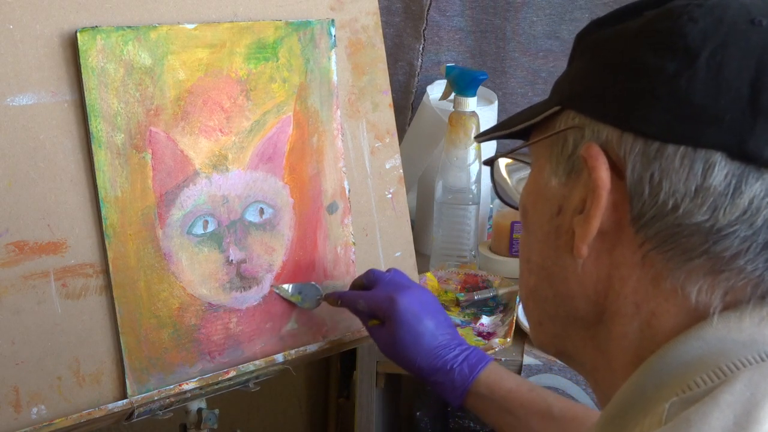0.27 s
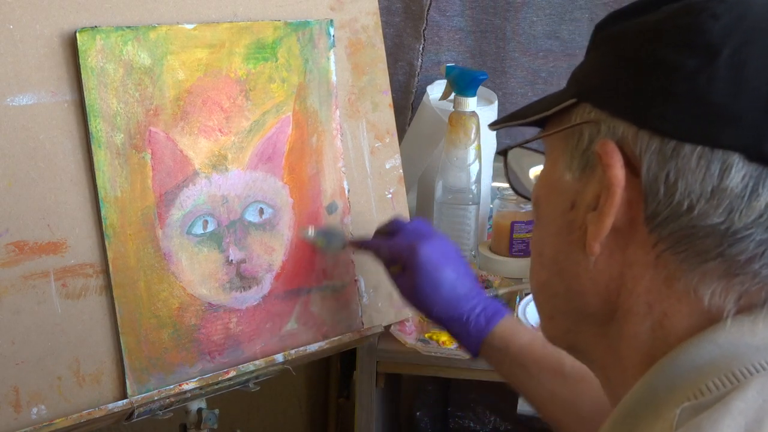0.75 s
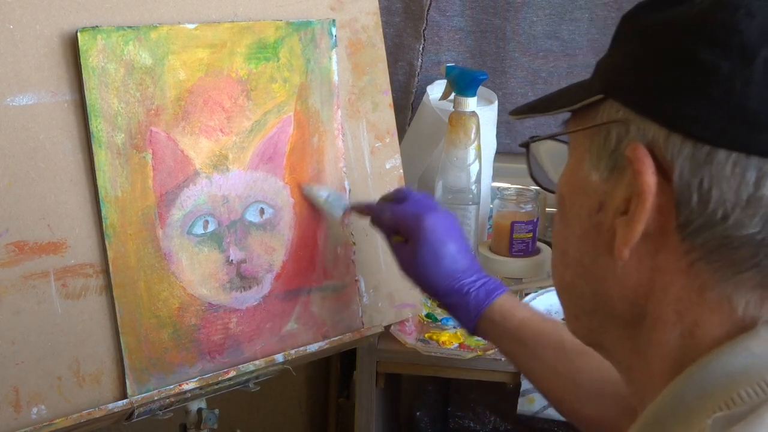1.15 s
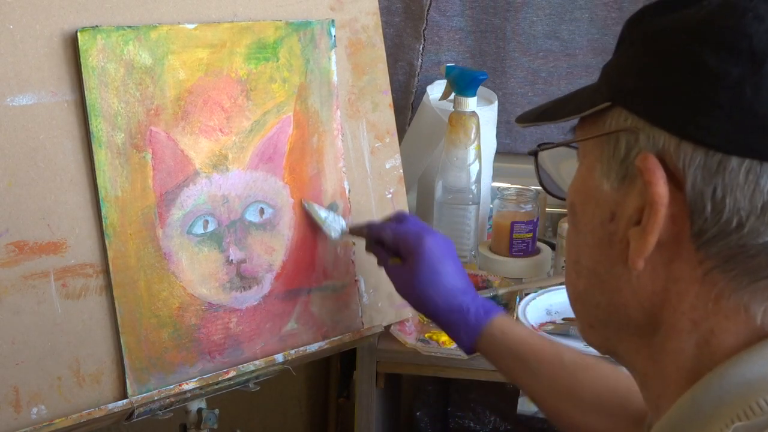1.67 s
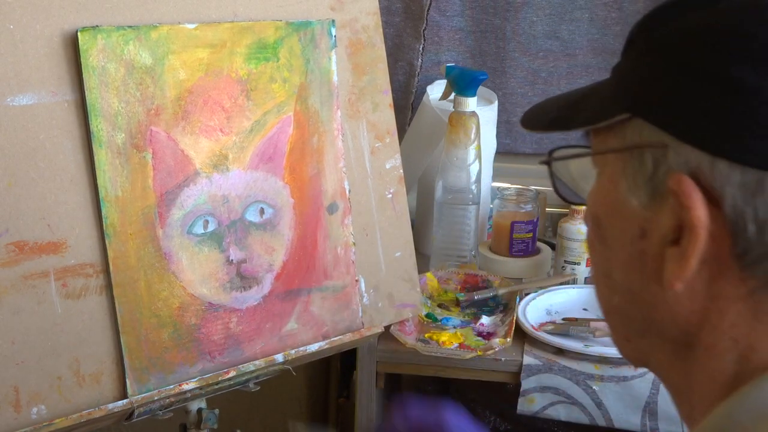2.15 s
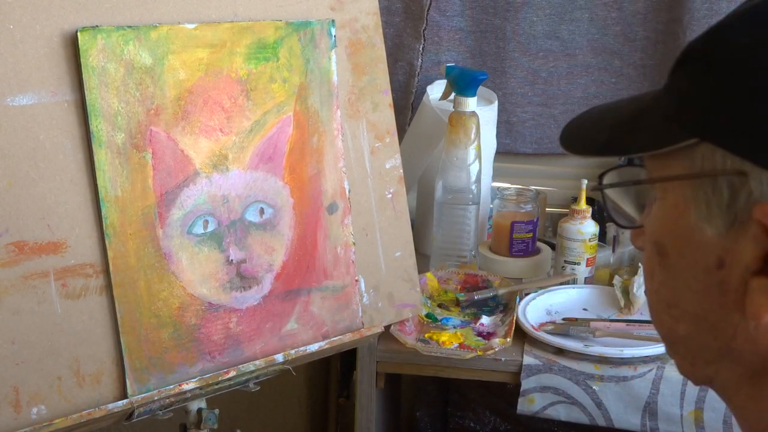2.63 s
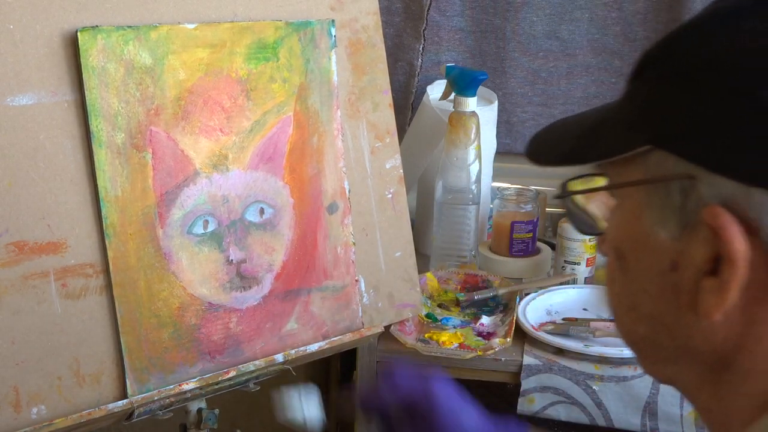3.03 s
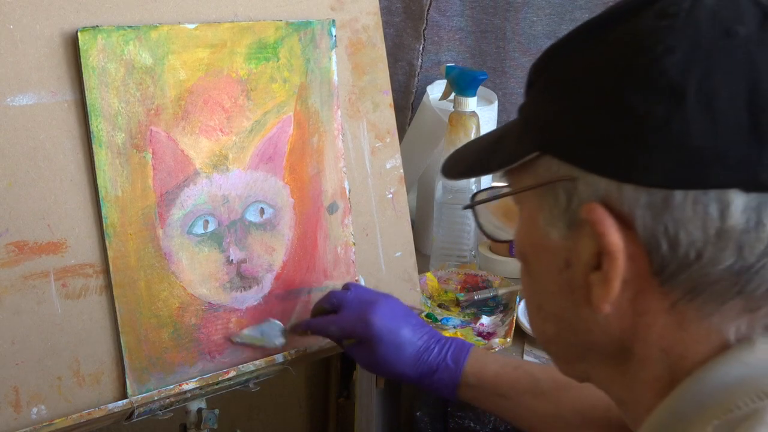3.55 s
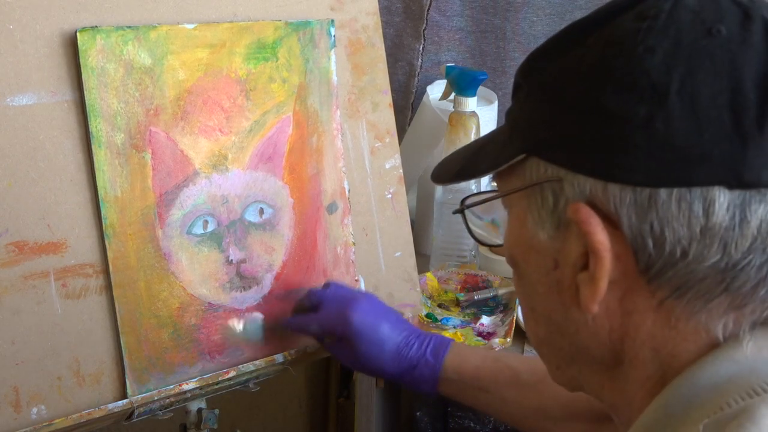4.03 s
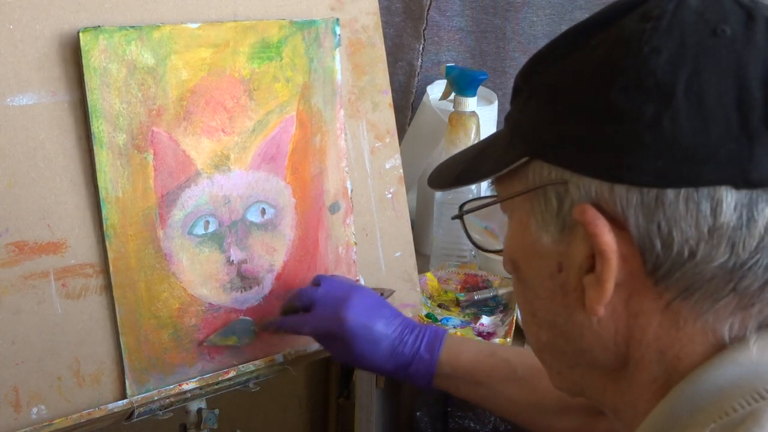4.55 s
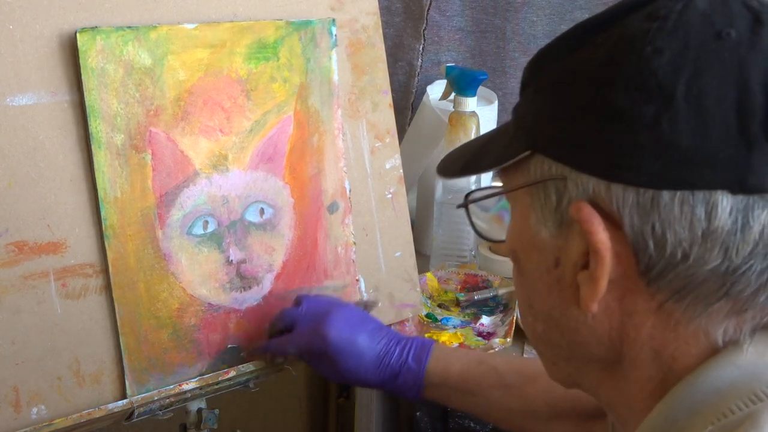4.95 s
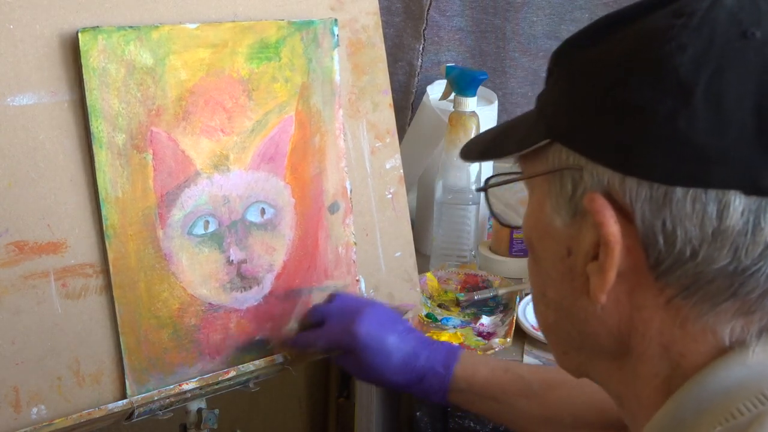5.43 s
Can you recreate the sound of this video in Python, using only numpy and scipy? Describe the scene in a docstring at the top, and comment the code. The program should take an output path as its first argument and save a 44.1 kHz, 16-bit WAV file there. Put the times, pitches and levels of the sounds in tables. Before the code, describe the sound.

A steel palette knife works wet paint on a board in a small, quiet studio. At about 0.4 seconds the blade brushes the surface faintly, and at 0.7 it makes a light scrape with thin squeaks. Two harder, short scrapes follow at 1.3 and 1.8 seconds, each led by a small metallic tap, gritty and ringing, the second ending in a sharp squeak. In the pause, a rubber glove rustles faintly around 2.4 seconds. From 3.4 seconds come light ticks of the tip and soft smears. The flat of the blade then slaps the board six times, unevenly, at about 3.9, 4.4, 4.7, 5.0, 5.2 and 5.4 seconds, with ticks and small snaps of tacky paint between. The stereo microphone stands back, hearing more of the room's short reflections than direct sound, over soft, steady room tone.

```python
"""A steel palette knife works paint on a board, on an easel in a small quiet studio.
One light and two hard scrapes make the blade sing and squeak; after a pause it dabs the board several
times, unevenly spaced, with light tip ticks between. Tacky paint snaps as the blade lifts, and a rubber
glove rustles in the pause. The stereo microphone stands far enough back to hear more room than direct
sound, over a soft bed of air."""
import sys
import numpy as np
from scipy import signal
from scipy.fft import rfft, irfft, next_fast_len
from scipy.io import wavfile
from scipy.ndimage import uniform_filter1d

SR = 44100
rng = np.random.default_rng(int(sys.argv[2]) if len(sys.argv) > 2 else 0)


def pcm_store(signal):
    """Save signal as 16-bit PCM."""
    levels = np.round(np.clip(np.atleast_2d(signal), -1, 1) * 32767)
    wavfile.write(sys.argv[1], SR, levels.astype(np.int16).T)


N = 250929
TIME = np.arange(N) / SR

# Levels in the tables are relative; each source adds its own gain.
# room tone: (frequency [Hz], level [dB])
AIR_SPECTRUM = [(18, -72), (30, -41), (69, -33.5), (123, -17), (196, -12.5), (216, -6.5), (291, -2),
                (338, -6), (567, -1.5), (658, -4), (1080, -0.5), (1520, -11.5), (3440, -18), (4200, -23),
                (11000, -29), (14300, -97), (22000, -120)]
# its stereo width: (frequency [Hz], side minus mid [dB])
AIR_SIDE = [(40, -1.5), (120, -13), (300, -11.5), (500, -6.5), (750, -6), (850, 7.5), (980, 2),
            (1120, -6.5), (1600, 1), (2300, -3), (6000, -4.5), (11000, -8)]
# its lean at the microphone: (frequency [Hz], left minus right [dB])
AIR_LEAN = [(400, 0.5), (700, 1), (900, 1), (1130, -13.5), (1500, -1), (2500, 0.5)]
# the blade barely brushes the board and sings faintly: (middle [s], length [s], level [dB])
FIRST_BRUSH = (0.41, 0.42, -61)
# scrapes: (bite time [s], length [s], skim before it [s], skim [dB], friction [dB], build-up [dB],
# ring [dB], grab [dB], lower blade mode [Hz], upper blade mode [Hz])
SCRAPE_STROKES = [(0.732, 0.19, 0.1897, -50.5, -46.5, -4.5, -48.5, -41.5, 1998, 3175),
                  (1.289, .163, .05, -47, -27.3, 1, -32, -19, 2252, 3144),
                  (1.833, 0.1, .035, -38, -22, -2, -25.5, -25.5, 2131, 3079)]
# friction of the edge on the board: (frequency [Hz], level [dB])
GRIT_SPECTRUM = [(150, -44), (450, -9.5), (900, -18), (1300, -1), (1650, -1), (2200, -1.5), (3500, -1.5),
                 (4050, -14), (4400, -2), (5700, -1.5), (7900, -4.5), (9300, -8), (10700, -11)]
# weaker overtones of the rubbed blade: (frequency [Hz], width [Hz], level [dB])
RUBBED_MODES = [(1230, 87, -13), (1490, 55, -17), (2737, 27, -0.5), (3230, 61, -7), (3845, 97, 0),
                (4270, 53, -1.5), (4550, 110, -1), (5260, 56, -4), (5800, 120, -3.5), (6140, 300, -4),
                (7740, 90, -15)]
# wet paint and rubber: (frequency [Hz], level [dB])
TACK_SPECTRUM = [(300, -9), (1200, 7), (2200, 9.5), (3500, 8.5), (5000, 3.5), (7500, 2), (11000, -5)]
# light smears of wet paint: (middle [s], length [s], level [dB])
PAINT_SMEARS = [(.42, 0.15, -54), (.423, .025, -49.5), (2.08, 0.067, -50), (3.48, .16, -52),
                (3.60, .12, -56.5), (3.83, 0.18, -52), (4.12, 0.3, -55), (4.952, .03, -43)]
# tacky paint lets go of the blade: (time [s], level [dB])
PAINT_SNAPS = [(.416, -33), (1.2447, -30.5), (3.8235, -26.5), (4.1488, -26.5), (4.9405, -25),
               (5.4725, -30.5)]
# the blade sticks and squeaks: (middle [s], length [s], start pitch [Hz], end pitch [Hz], level [dB])
BLADE_SQUEAKS = [(0.417, .03, 4230, 4230, -55), (.426, .033, 5200, 5170, -55),
                 (.615, 0.14, 3140, 3150, -54), (.741, 0.045, 3190, 3200, -42),
                 (0.773, 0.031, 2010, 1990, -39.5), (0.776, 0.053, 1200, 1170, -43),
                 (0.833, 0.023, 4100, 3920, -45.5), (.848, 0.043, 4880, 4730, -53),
                 (0.888, 0.053, 3700, 3460, -48.5), (1.326, 0.094, 1330, 1293, -37),
                 (1.41, 0.046, 4400, 4200, -36.5), (1.919, 0.055, 3140, 3010, -22.5),
                 (2.041, 0.041, 3076, 3020, -50), (2.432, 0.029, 3745, 3680, -49)]
# the blade lands before a stroke: (time [s], ring [dB], edge crack [dB])
BLADE_LANDINGS = [(1.2161, -32, -75), (1.7378, -30, -41), (1.8025, -30.5, -53)]
# ring of the free blade: (frequency [Hz], width [Hz], level [dB])
FREE_MODES = [(1093, 37, -2.5), (1895, 83, -2), (3070, 100, -9.5), (3520, 180, -14.5), (4220, 160, -29),
              (4570, 56, -17), (6170, 165, -37), (7890, 210, -32)]
# the tip touches the board: (time [s], ring [dB], edge crack [dB])
TIP_TICKS = [(3.372, -42, -66), (3.5795, -42, -53), (3.6961, -46, -54.5), (4.0126, -34, -47),
             (4.6402, -35, -44), (4.6773, -39, -39.5), (4.829, -37, -45), (5.0547, -41, -45),
             (5.1668, -30.5, -39.5), (5.4916, -31.5, -35.5)]
# ring of the tip: (frequency [Hz], width [Hz], level [dB])
TIP_MODES = [(1960, 61, -10.5), (2944, 120, -5), (3320, 140, -5.5), (4120, 340, -11)]
# the flat of the blade slaps the board, pinned at a new spot each time: (time [s], knock [dB],
# ring [dB], lower mode [Hz], upper mode [Hz], smear going in [dB], smear coming off [dB])
FLAT_SLAPS = [(3.8801, -27, -30, 3100, 4380, -52, -63), (4.4300, -24.5, -27, 1010, 4100, -47.5, -48.5),
              (4.7190, -20.5, -21, 2100, 3450, -47, -50), (4.9597, -20.5, -25, 3550, 6050, -46, -52.5),
              (5.2125, -25, -25.5, 1670, 3280, -46.5, -53), (5.4198, -21, -21, 1830, 3100, -53, -53)]
# knock of blade on board: (frequency [Hz], width [Hz], level [dB])
BOARD_MODES = [(525, 310, -10.5), (1220, 180, -6.5), (1913, 200, -7.5), (2420, 350, -6), (2960, 100, -5),
               (3160, 170, -9.5), (3375, 180, -3), (5000, 490, -12)]
# the glove rustles: (middle [s], length [s], level [dB])
GLOVE_RUSTLES = [(2.31, 0.067, -60), (2.397, 0.043, -49), (2.433, 0.013, -41), (2.48, 0.13, -58.5),
                 (2.82, 0.02, -53)]
# the studio's decay: (frequency [Hz], time to fall 60 dB [s])
STUDIO_T60 = [(300, .25), (1200, .23), (3000, .24), (6000, .24), (11000, .22)]
# stereo width of its tail: (frequency [Hz], side minus mid [dB])
STUDIO_SIDE = [(200, -12), (600, -9), (900, -8), (1300, -9.5), (2200, -12.5), (5000, -10.5), (11000, -9)]


def from_db(db):
    """Decibels to gain."""
    return 10 ** (np.asarray(db) / 20)


def rms_one(x):
    """Scale to rms 1."""
    return x / np.sqrt(np.mean(x ** 2) + 1e-20)


def at_hz(points, hz):
    """Read a table on a log-frequency axis."""
    points = np.array(points)
    return np.interp(np.log(np.maximum(hz, 1)), np.log(points[:, 0]), points[:, 1])


def coloured(x, spectrum):
    """Shape a sound by a spectrum in dB."""
    size = next_fast_len(len(x))
    hz = np.arange(size // 2 + 1) * SR / size
    return irfft(rfft(x, size) * from_db(at_hz(spectrum, hz)), size)[:len(x)]


def low_cut(x, hz):
    """A gentle first-order bass roll-off."""
    return signal.sosfilt(signal.butter(1, hz, "high", fs=SR, output="sos"), x)


def resonate(x, hz, width_hz):
    """One resonance; a unit click rings with unit energy."""
    radius = np.exp(-np.pi * width_hz / SR)
    feedback = [1, -2 * radius * np.cos(2 * np.pi * hz / SR), radius ** 2]
    return signal.lfilter(np.sqrt((1 - radius ** 2) / 2) * np.array([1, 0, -1]), feedback, x + 1e-18)


def body(x, modes):
    """Resonances in parallel, alternating in sign."""
    return sum((-1) ** k * from_db(db) * resonate(x, hz, width)
               for k, (hz, width, db) in enumerate(modes))


def clicks(rows, column=1):
    """One click per row, as strong as the chosen dB column."""
    rows, out = np.array(rows), np.zeros(N)
    out[np.round(rows[:, 0] * SR).astype(int)] = from_db(rows[:, column])
    return out


def slips(per_s, spread_db):
    """Tiny random slips of uneven size; rms 1."""
    sizes = from_db(spread_db * np.minimum(rng.exponential(1, N), 4)) * rng.choice([-1, 1], N)
    return rms_one(sizes * (rng.random(N) < per_s / SR))


def swells(rows):
    """A smooth rise and fall for each (middle [s], length [s], level [dB])."""
    return sum(from_db(db) * np.cos(np.pi * np.clip((TIME - middle) / length, -.5, .5))
               for middle, length, db in rows)


def stereo(mid, side):
    """Left and right from mid and side."""
    return mid + side * np.array([[1], [-1]])


def air():
    """Steady room tone, wide and leaning right around one kilohertz, near the centre in the bass."""
    mid, side = [rms_one(coloured(white, AIR_SPECTRUM)) for white in rng.standard_normal((2, N))]
    left, right = stereo(mid, coloured(side, AIR_SIDE))
    half_lean = np.array(AIR_LEAN) * [1, .5]
    return from_db(-52.5) * np.array([coloured(left, half_lean), coloured(right, half_lean * [1, -1])])


def singing(hz, width_hz):
    """A friction-driven mode: pitch follows the contact, phase wanders, and friction limits the swing."""
    kicks = rng.standard_normal(len(hz)) + 1j * rng.standard_normal(len(hz))
    swing = signal.sosfilt(signal.butter(2, width_hz / 2, fs=SR, output="sos"), kicks)
    limited = swing / np.sqrt(np.abs(swing) ** 2 + np.var(swing))
    return rms_one(np.real(limited * np.exp(2j * np.pi * np.cumsum(hz) / SR)))


def scrapes():
    """The edge skims, bites on dry ridges of paint and lifts; under pressure two blade modes sing."""
    bite_s, release_s, ring_on_s = .026, .006, .009
    grab_share, grab_s = .785, .027   # late in the stroke the blade grabs and sings out
    free_hz, sag_share = 1910, .75
    catches = rms_one(coloured(slips(per_s=3000, spread_db=3.5), GRIT_SPECTRUM))
    overtones = rms_one(body(slips(per_s=5000, spread_db=4), RUBBED_MODES))
    grit = catches + from_db(-4.5) * overtones
    out, brush = np.zeros(N), swells([FIRST_BRUSH])
    for (start, length, skim_s, skim_db, friction_db, build_db,
         ring_db, grab_db, lower_hz, upper_hz) in SCRAPE_STROKES:
        near = np.abs(TIME - start) < .5
        t = TIME[near] - start
        approach, bite, progress = np.clip([1 + t / skim_s, t / bite_s, t / length], 0, 1)
        since_lift = np.maximum(t - length, 0)
        skim = from_db(skim_db) * approach * (1 - bite)
        pressure = np.sin(np.pi / 2 * bite) ** 2 * from_db(build_db * (progress - 1))
        grab = swells([(start + grab_share * length, grab_s, grab_db)])[near]
        # the bite stiffens the lower mode above its free pitch; it sags as the edge slides on
        rise_hz = (lower_hz - free_hz) * approach * (1 - sag_share * progress)
        lower = singing(free_hz + rise_hz, width_hz=185)
        upper = singing(np.full(len(t), upper_hz), width_hz=185)
        modes = from_db(-3.5) * lower + from_db(-4.5) * upper
        pressed_friction = from_db(friction_db) * pressure * np.exp(-since_lift / release_s)
        pressed_ring = from_db(ring_db) * pressure * np.exp(-since_lift / ring_on_s)
        friction = skim + pressed_friction + from_db(-11) * grab
        ring = brush[near] + from_db(-6) * skim + pressed_ring + grab
        out[near] += from_db(-3) * friction * grit[near] + ring * modes
    return out


def wet_paint():
    """Paint crackles softly as it is spread; when the blade lifts, it lets go with one sharp snap."""
    lead_s, squeeze_s = .011, .11   # each slap squeezes paint as it lands
    lag_s, drag_s = .091, .12   # and drags it coming off
    squeezes = [(time - lead_s, squeeze_s, in_db) for time, *_, in_db, _ in FLAT_SLAPS]
    drags = [(time + lag_s, drag_s, off_db) for time, *_, off_db in FLAT_SLAPS]
    tack = rms_one(coloured(slips(per_s=2000, spread_db=1.5), TACK_SPECTRUM))
    snaps = from_db(16.5) * low_cut(clicks(PAINT_SNAPS), hz=1800)
    return swells(PAINT_SMEARS + squeezes + drags) * tack + snaps


def squeaks():
    """Short stick-slip tones that slide as the contact moves along the blade."""
    out = np.zeros(N)
    for middle, length, start_hz, end_hz, db in BLADE_SQUEAKS:
        near = np.abs(TIME - middle) < .25
        hz = np.interp(TIME[near], [middle - length / 2, middle + length / 2], [start_hz, end_hz])
        out[near] += swells([(middle, length, db)])[near] * singing(hz, width_hz=86)
    return out


def edge_crack(hits, decay_s=.0025):
    """Each contact of the steel edge is a bright, dying burst of tiny slips."""
    decay = np.exp(-1 / (decay_s * SR))
    envelope = signal.lfilter([np.sqrt(1 - decay ** 2)], [1, -decay], hits + 1e-18)
    burst = envelope * rng.choice([-1, 1], N)
    return resonate(resonate(burst, hz=4650, width_hz=3000), hz=6000, width_hz=7100)


def dabs():
    """Landings, tip touches and flat slaps each ring their own modes and crack at the edge."""
    landings = from_db(21) * body(clicks(BLADE_LANDINGS), FREE_MODES)
    ticks = from_db(22) * body(clicks(TIP_TICKS), TIP_MODES)
    # the small board radiates little bass
    knocks = from_db(17.5) * low_cut(body(clicks(FLAT_SLAPS), BOARD_MODES), hz=171)
    pinned_ring = from_db(13.5) * sum(resonate(clicks([slap], column=2), hz, width_hz=220)
                                      for slap in FLAT_SLAPS for hz in slap[3:5])
    edge_hits = (from_db(26) * clicks(BLADE_LANDINGS, column=2)
                 + from_db(22.5) * clicks(TIP_TICKS, column=2)
                 + from_db(11.5) * clicks(FLAT_SLAPS))
    return landings + ticks + knocks + pinned_ring + from_db(-4.5) * edge_crack(edge_hits)


def glove():
    """Thin rubber creases as the hand moves."""
    creases = coloured(slips(per_s=1200, spread_db=5.5), TACK_SPECTRUM)
    return swells(GLOVE_RUSTLES) * rms_one(resonate(creases, hz=11400, width_hz=12000))


def studio(x, gap_s=.0053, bounce_db=-3.5, tail_db=4.5, early_db=5.5, early_s=.0052):
    """At the microphone: direct sound, a hard bounce off a near surface, a dense tail dying by band."""
    t = np.arange(SR // 2) / SR
    hz = np.arange(len(t) // 2 + 1) * SR / len(t)
    centres_hz = np.geomspace(300, 11000, num=6)
    bands = [np.interp(hz, centres_hz, row) for row in np.eye(len(centres_hz))]
    decays = [from_db(-60 * t / at_hz(STUDIO_T60, centre)) for centre in centres_hz]
    onset = (t > gap_s) * (1 + from_db(early_db) * np.exp(-t / early_s))
    tails = []
    for phases in rng.random((2, len(hz))):
        white = np.exp(2j * np.pi * phases)
        tail = onset * sum(irfft(white * band, len(t)) * decay for band, decay in zip(bands, decays))
        spectrum = rfft(tail)
        # the walls favour no pitch
        even = spectrum / np.sqrt(uniform_filter1d(np.abs(spectrum) ** 2, size=120))
        tails.append(from_db(tail_db) * irfft(even, len(t)) * (t > gap_s) * (t < t[-1] / 2))
    mid = clicks([(0, 0), (gap_s, bounce_db)])[:len(t)] + tails[0]
    response = stereo(mid, coloured(tails[1], STUDIO_SIDE)) / np.linalg.norm(mid)
    return signal.fftconvolve(x[None], response, axes=1)[:, :N]


def scene():
    """Knife, paint and glove at the easel, heard through the studio over its room tone."""
    return studio(scrapes() + squeaks() + dabs() + wet_paint() + glove()) + air()


def record(dry, cutoff_hz=11050):
    """The microphone's signal, with the top cut steeply."""
    return signal.sosfilt(signal.ellip(12, .1, 80, cutoff_hz, fs=SR, output="sos"), dry)


dry = scene()
out = record(dry)
pcm_store(out)
```